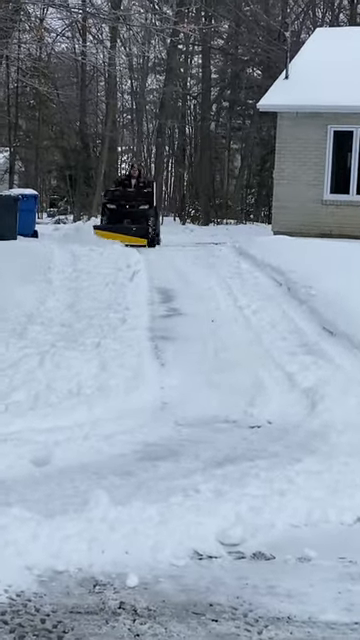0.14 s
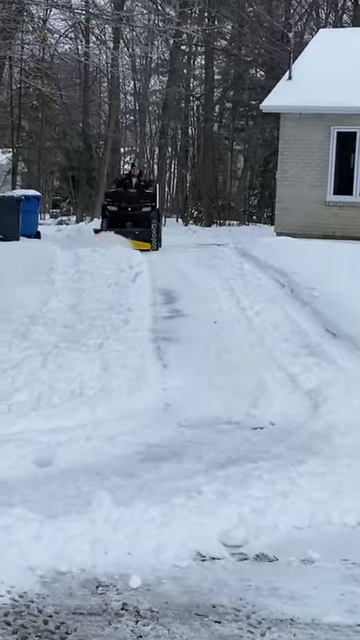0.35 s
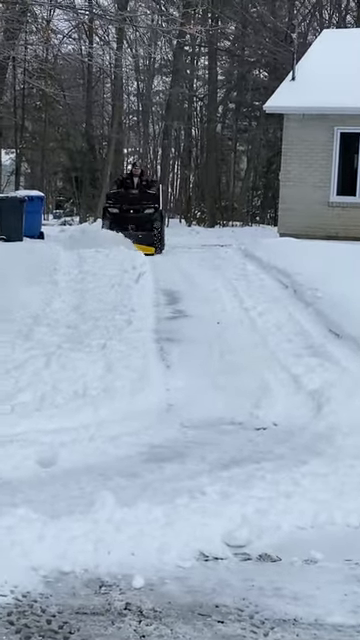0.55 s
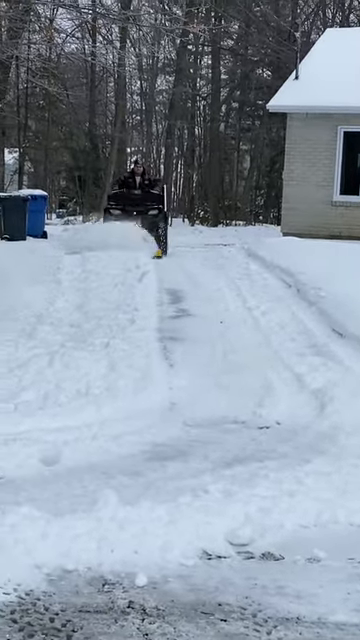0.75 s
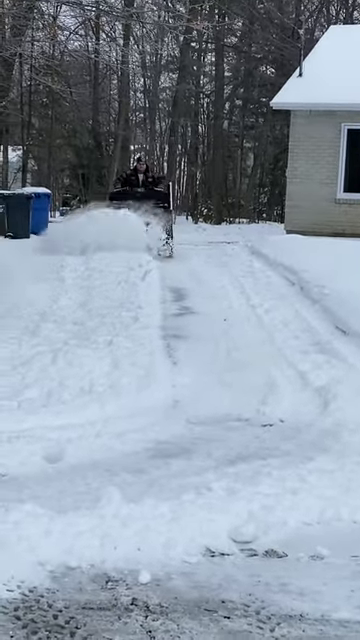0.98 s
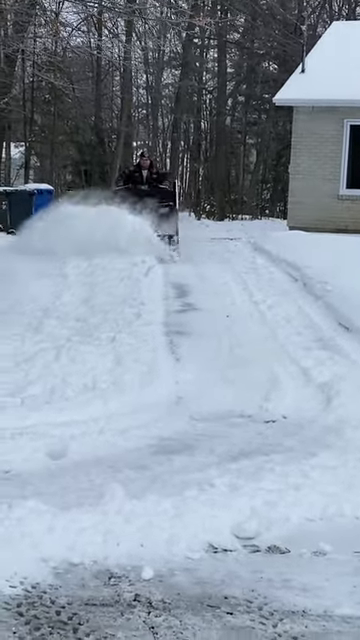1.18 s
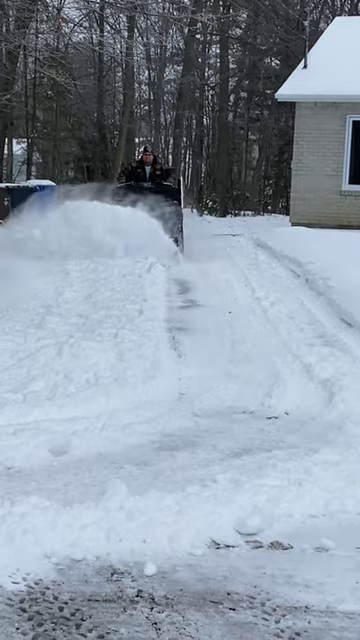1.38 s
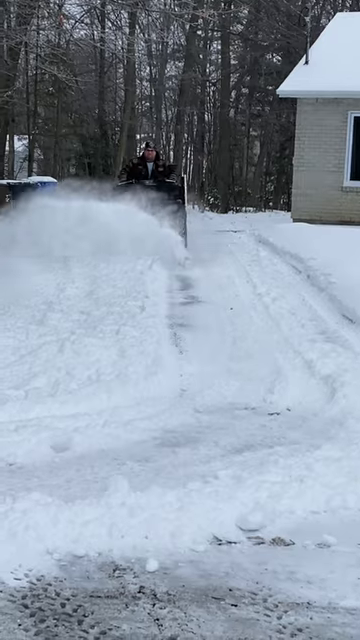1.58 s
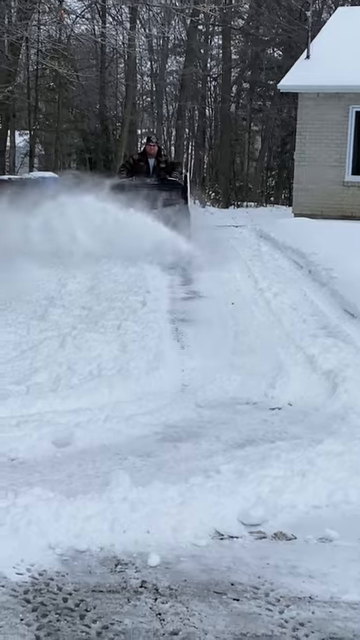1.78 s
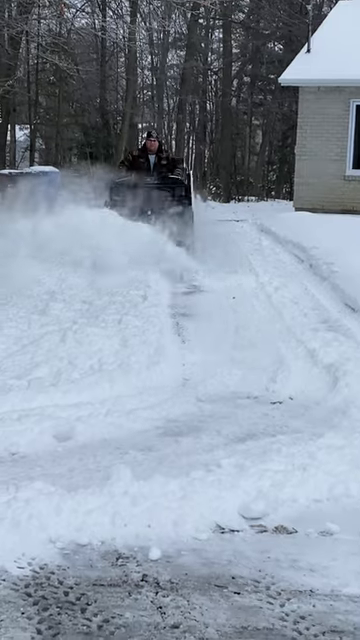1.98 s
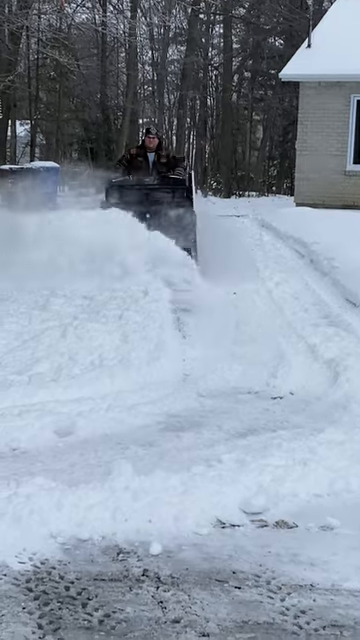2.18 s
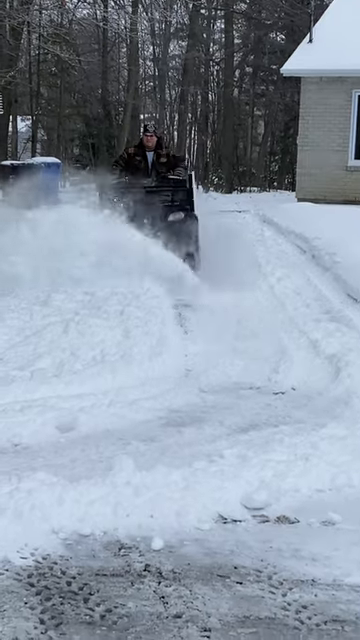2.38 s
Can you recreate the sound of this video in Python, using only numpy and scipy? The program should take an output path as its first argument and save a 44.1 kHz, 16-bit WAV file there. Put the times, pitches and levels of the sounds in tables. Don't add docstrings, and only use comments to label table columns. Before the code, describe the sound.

A small four-wheeler's low engine drones and sags under load with gear whine; its blade bites, scrapes and bumps frozen ground, snow hisses, then heavy metallic slams; outdoors, approaching a phone microphone in light breeze.

```python
import sys
import numpy as np
from scipy import signal
from scipy.fft import rfft, irfft, next_fast_len
from scipy.io import wavfile

SR = 44100
rng = np.random.default_rng(int(sys.argv[2]) if len(sys.argv) > 2 else 0)


def elevation(decibels):
    levels = np.asarray(decibels, float)
    return 10 ** (levels / 20)


def store_pcm(level_fs):
    pcm = np.round(np.clip(level_fs, -1, 1) * 32767).astype(np.int16)
    wavfile.write(sys.argv[1], SR, np.atleast_2d(pcm).T)


N = 112014


def rms_one(x):
    return x / np.sqrt(np.mean(x ** 2) + 1e-20)


def in_time(rows):
    s, *columns = np.transpose(rows)
    return [np.interp(np.arange(N) / SR, s, c) for c in columns]


def at_hz(points, hz):
    point_hz, value = np.array(points).T
    return np.interp(np.log(hz), np.log(point_hz), value)


def drift(rate_per_s):
    r = np.exp(-80 * np.pi * rate_per_s / SR)
    noise = rng.standard_normal(N // 40 + 2002)
    slow = signal.lfilter([1], [1, -2 * r, r * r], noise)[2000:]
    return np.interp(np.arange(N) / 40, np.arange(len(slow)), rms_one(slow))


def ring(x, hz, t60_s):
    r = elevation(-60 / (t60_s * SR))
    w = 2 * np.pi * hz / SR
    return signal.lfilter([0, np.sin(w)], [1, -2 * r * np.cos(w), r * r], x + 1e-18)


def butter(x, hz, kind, order=2):
    return signal.sosfilt(signal.butter(order, hz, kind, fs=SR, output="sos"), x)


def butter_twice(x, hz, kind):
    return butter(butter(x, hz, kind), hz, kind)


def coloured(sources, spectrum, patchy_db):
    edges_hz = np.geomspace(spectrum[0][0], min(spectrum[-1][0], 17000), 16)
    out = np.zeros(N)
    for k, (lo, hi) in enumerate(zip(edges_hz, edges_hz[1:])):
        level_db = at_hz(spectrum, np.sqrt(lo * hi)) + patchy_db * drift(22.5)
        out += elevation(level_db) * butter(sources[k % 2], [lo, hi], "band")
    return rms_one(out)


def grains(per_s, spread_db):
    size = elevation(spread_db * np.minimum(rng.exponential(1, (2, N)), 5))
    sign = rng.choice([-1, 1], (2, N))
    return size * sign * (rng.random((2, N)) < per_s / SR) + 1e-18


def wind():
    breeze_db, gust_db, gust_s, gust_length_s = -67, -41.5, 0.26, 0.1
    t = np.arange(N) / SR
    gust = elevation(gust_db) * np.exp(-((t - gust_s) / gust_length_s) ** 2)
    puffs = rms_one(butter_twice(rng.standard_normal(N), (50, 302), "band"))
    breeze = elevation(breeze_db + 7.3 * drift(5.5))
    return (gust + breeze) * puffs * np.array([[1], [-1]])


# (time [s], scrape level [dB], thrown snow level [dB])
BLADE = [(0, -49.5, -64), (.25, -50, -61.5), (.575, -50, -57.5), (.6, -40.5, -54), (.7, -43.5, -52.5),
         (.78, -47.5, -56), (.85, -41.5, -52), (.95, -45.5, -48.5), (1.08, -41.5, -45.5), (1.2, -39, -45),
         (1.4, -41.5, -43.5), (1.6, -41.5, -45), (1.8, -39.5, -42.5), (2.05, -42, -37.5),
         (2.15, -41, -41.5), (2.35, -37, -42), (2.48, -43, -46.5), (2.54, -37, -40.5)]
# (frequency [Hz], density [dB per Hz])
SCRAPE_SPECTRUM = [(250, 7), (420, 2), (800, 3), (1250, -1.5), (1650, 2.5), (2100, -9.5), (2600, -0.5),
                   (5000, -23.5)]
# (frequency [Hz], density [dB per Hz])
SPRAY_SPECTRUM = [(1500, 1.5), (2500, -4), (4000, 0), (5500, -3), (8000, -1.5), (10000, -10.5),
                  (13000, -12), (16500, -14.5)]


def ploughing():
    scrape_db, spray_db = in_time(BLADE)
    judder = drift(20)
    chatter = grains(per_s=4000, spread_db=2.5) * elevation(1.2 * judder)
    scrape = coloured(chatter, SCRAPE_SPECTRUM, patchy_db=2.0)
    crystals = grains(per_s=12000, spread_db=3) * elevation(0.7 * judder + 0.5 * drift(40))
    spray = coloured(crystals, SPRAY_SPECTRUM, patchy_db=1.6)
    return elevation(scrape_db + 4.0) * scrape + elevation(spray_db + 3.5) * spray


# (time [s], peak level [dB], pitch [Hz])
CHIPS = [(0.5891, -33, 3500), (0.5956, -31, 2500), (0.624, -32, 3000), (0.648, -28, 2200),
         (0.663, -28, 1800), (0.8605, -31, 4500), (0.9423, -31, 4000), (1.0112, -31, 4000),
         (1.082, -25, 4500), (1.2152, -28, 4000), (1.4981, -29, 4000), (1.6886, -23, 3400),
         (1.716, -28, 3600), (1.721, -27, 3600), (1.7959, -26, 4500), (1.8248, -25, 4000),
         (1.843, -27, 4500), (1.8597, -24, 5000), (1.955, -27, 5000), (2.1361, -28, 4000),
         (2.187, -24, 4200), (2.192, -25, 3500), (2.2035, -21, 5000), (2.2125, -24, 4500),
         (2.2514, -25, 4000), (2.2583, -21, 5200), (2.3282, -27, 4200)]


def ice_chips():
    gain_db, cycles = 3, 9
    out = np.zeros(N + 4000)
    click = np.arange(4000) == 0
    for s, db, hz in CHIPS:
        out[int(s * SR):][:4000] += ring(elevation(db + gain_db) * click, hz, cycles / hz)
    return out[:N]


# (time [s], rms level [dB], pitch [Hz], length [s])
SQUEAKS = [
    (1.063, -44, 2420, .015),
    (1.111, -43, 2340, 0.019),
    (1.3, -40, 2470, .015),
    (1.355, -49, 2610, .012),
    (1.448, -40, 2630, 0.011),
    (1.543, -41.5, 2500, .015),
    (1.796, -42, 2581, 0.0097),
    (1.965, -40.5, 2400, .012),
    (2.01, -33.5, 2460, 0.013),
    (2.486, -38.5, 2510, 0.011),
]


def ice_squeaks():
    out = np.zeros(N + 4000)
    t = np.arange(4000) / SR
    middle_s = t.mean()
    for s, db, hz, length_s in SQUEAKS:
        swell = np.exp(-((t - middle_s) / length_s) ** 2)
        tone = rms_one(ring(rng.standard_normal(4000), hz, t60_s=0.024))
        at = out[int((s - middle_s) * SR):][:4000]
        at += elevation(db) * swell * tone
    return out[:N]


# (time [s], level [dB])
SLAMS = [(2.2534, -29), (2.2576, -26), (2.2615, -25), (2.266, -26), (2.271, -28.5), (2.277, -31),
         (2.308, -34), (2.328, -30), (2.334, -31.5), (2.344, -34.5), (2.374, -31), (2.385, -30),
         (2.395, -35), (2.411, -31.5), (2.419, -32)]
# (frequency [Hz], level [dB], t60 [s])
FRAME_MODES = [(157, -12, .09), (269.6, -5, 0.17), (326, -4.5, 0.041), (399, 0.5, 0.13),
               (770, -10.5, 0.039), (988, -4.5, 0.06), (1410, -8, 0.045), (1595, -8, 0.044),
               (1747, 0, 0.052), (2474, -7.5, 0.029), (4240, -11, 0.021), (4600, -12, 0.027),
               (4900, -8.5, 0.047)]


def slams():
    at = [int(s * SR) for s, _ in SLAMS]
    slam_db = np.array(SLAMS)[:, 1]
    size = (len(SLAMS), len(FRAME_MODES))
    share = rng.choice([-1, 1], size) * elevation(rng.normal(0, 1.6, size))
    out = np.zeros(N)
    for (hz, db, t60_s), mode_share in zip(FRAME_MODES, share.T):
        clicks = np.zeros(N)
        clicks[at] = elevation(slam_db + db) * mode_share
        out += ring(clicks, hz, t60_s)
    return butter(out, 5000, "low")


# (time [s], peak level [dB], length [s], brightness [0-1])
BUMPS = [(0.593, -19.5, 0.0056, 0.64), (0.6194, -27, 0.014, 0.5), (0.6444, -22, 0.013, 0.33),
         (0.6744, -25, 0.009, 0.24), (1.1209, -19, 0.045, 0.49), (1.2094, -21.5, 0.02, 0.5),
         (1.2894, -20.5, 0.014, 0.37), (1.3458, -29, 0.039, 0), (1.7994, -18, 0.02, 0.55),
         (2.2544, -15, 0.007, 0.6), (2.2613, -8, 0.013, 0.6), (2.3286, -17, 0.016, 0.44),
         (2.3744, -21.5, 0.023, 0.38), (2.4084, -16.5, 0.011, 0.4), (2.4718, -25.5, 0.043, 0.56),
         (0.8604, -21.0, 0.0098, 0.82), (0.9428, -21, 0.014, 0.57), (1.0819, -17.5, 0.012, 0.74),
         (1.7, -36, 0.0097, 0), (1.055, -27, 0.008, 0.55), (1.8, -25, 0.0099, 0.35),
         (2.5, -20, 0.0036, 0.8), (0.659, -20, 0.0083, 0.55), (0.603, -24, 0.0065, 0.2),
         (1.8597, -12.5, 0.007, 0.74), (2.1889, -13, 0.009, 0.77), (2.2044, -10.5, 0.0072, 0.88)]
# (frequency [Hz], level [dB], t60 [s])
STEEL_MODES = [(410.4, -6.5, 0.11), (286, -8.5, 0.041), (167, 9, 0.037), (830, -23, 0.071),
               (912, -10, 0.072), (1005, -13, 0.059), (1200, -10, 0.02), (1440, -26, 0.063),
               (1550, -12, 0.039), (1650, -9, 0.026), (2520, -15, 0.045), (2970, -16, 0.024),
               (4300, -17, 0.015), (5140, -14.5, 0.0096)]


def bumps():
    steel_db, crunch_db = -20.5, -7
    t = np.arange(N) / SR
    crunch = rng.standard_normal(N)
    dull = 2.8 * butter(crunch, [250, 2460], "band")
    bright = 1.24 * butter(crunch, (2300, 5900), "band", order=1)
    share_db = rng.normal(0, 2.5, (len(BUMPS), len(STEEL_MODES)))
    out = np.zeros(N)
    strikes = np.zeros((len(STEEL_MODES), N))
    for (s, db, length_s, shine), row_db in zip(BUMPS, share_db):
        at = slice(int((s - 0.002) * SR), int((s + 0.12) * SR))
        age = np.maximum(t[at] - s + 0.0041, 0) / max(length_s, 0.002)
        shape = elevation(db) * 3.48 * age ** 0.95 * np.exp(-age * 2.03)
        shine = np.clip(shine, 0, 1)
        out[at] += elevation(crunch_db) * shape * ((1 - shine) * dull[at] + shine * bright[at])
        strikes[:, at] += (1 - shine) * shape * crunch[at] * elevation(row_db)[:, None]
    for x, (hz, db, t60_s) in zip(strikes, STEEL_MODES):
        out += elevation(steel_db + db - 7.5) * ring(x, hz, t60_s)
    return out


# (time [s], pitch [Hz], level [dB])
WHINE = [(0, 1600, -58), (.3, 1570, -54), (.38, 1600, -45), (.52, 1645, -45), (.6, 1665, -52),
         (.9, 1680, -51), (1.0, 1685, -45), (1.15, 1690, -46), (1.22, 1660, -47), (1.4, 1685, -45),
         (1.6, 1670, -45.5), (1.72, 1705, -48), (1.88, 1745, -46), (2.0, 1745, -52), (2.54, 1750, -54)]


def gear_whine():
    width_hz, steadiness = 50, 1.3
    low_share, low_db, low_fade_s = 0.88, -50, 0.55
    hz, level_db = in_time(WHINE)
    shiver = butter(rng.standard_normal((2, N)), width_hz / 2, "low")
    phasor = steadiness + rms_one(shiver[0]) + 1j * rms_one(shiver[1])
    whine = np.real(phasor * np.exp(2j * np.pi * np.cumsum(hz) / SR))
    low_gear = ring(rng.standard_normal(N), low_share * WHINE[0][1], 2.2 / width_hz)
    low_fade = np.exp(-(np.arange(N) / SR / low_fade_s) ** 6)
    return elevation(level_db) * rms_one(whine) + elevation(low_db) * rms_one(low_gear) * low_fade


# (frequency [Hz], density [dB per Hz])
CASING_SPECTRUM = [(350, -23.5), (500, -7.5), (1200, -2.5), (1600, -4.5), (2000, -4.5), (3300, -10),
                   (6000, -22), (16500, -38)]


def casing_clatter(cycle):
    sharpness, lag_cycles = 0.29, 0.44
    beat = np.exp(sharpness * np.cos(cycle - 2 * np.pi * lag_cycles))
    return coloured(rng.standard_normal((2, N)) * beat, CASING_SPECTRUM, patchy_db=2.0)


def exhaust_puff(cycle):
    bursts = rng.standard_normal(N) * np.exp(0.8 * np.cos(2 * cycle))
    return rms_one(butter_twice(bursts, (38, 320), "band"))


FREE_HZ = 35
WAVER_PER_S, WAVER_RAD = 6, 0.045
# (multiple of cycle rate [1], level [dB])
ORDERS = [(1, -23.5), (2, -3), (3, -3.5), (4, -0.5), (5, -2.5), (6, -12), (7, -10), (8, -19.5), (9, -23.5),
          (10, -33.5)]


def exhaust_tones(hz, cycle):
    boom_hz, boom_width_hz, boom_db = 118.3, 13.8, 6.5
    waver_db, brighten_db_per_hz = 1.8, 0.35
    odd_rad, odd_rad_per_order = -4.3, 0.75
    sag_hz = FREE_HZ - hz
    strain = np.clip(0.4 + sag_hz / 5, 0, 1)
    out = np.zeros(N)
    for k, db in ORDERS:
        if k == 2:
            continue
        boom = boom_db / (1 + ((k * hz - boom_hz) / boom_width_hz) ** 2)
        brighten = brighten_db_per_hz * max(k - 5, 0) * sag_hz
        level_db = db + brighten + strain * waver_db * drift(WAVER_PER_S) + boom
        phase = k * (cycle + strain * WAVER_RAD * drift(WAVER_PER_S))
        phase = phase + k % 2 * (odd_rad + odd_rad_per_order * k)
        out += elevation(level_db) * np.cos(phase)
    return rms_one(out)


# (time [s], cycle rate [Hz], exhaust level [dB], once-per-turn throb level [dB])
ENGINE = [(0.0, 35.15, -27.5, -35), (0.4, 34.22, -24.5, -31.5), (0.56, 34.08, -26, -39.5),
          (0.81, 33.05, -27.5, -33), (0.94, 32.78, -24, -30), (1.21, 31.86, -25.5, -30.5),
          (1.39, 31.47, -24, -38), (1.64, 31.1, -23, -29), (1.9, 31.18, -24, -28), (2.0, 30.9, -21, -48),
          (2.03, 30.86, -21, -32), (2.1, 30.83, -24.5, -37), (2.26, 30.72, -21, -30),
          (2.48, 30.83, -22.5, -26.5), (2.51, 30.3, -21, -33), (2.54, 30.7, -19.5, -40)]


def engine():
    puff_db, puff_db_per_hz, casing_db, start_rad = -23, 2.8, -20.5, -0.55
    hz, level_db, throb_db = in_time(ENGINE)
    cycle = start_rad + 2 * np.pi * np.cumsum(hz) / SR
    tones = exhaust_tones(hz, cycle)
    throb = elevation(throb_db + 3) * np.cos(2 * cycle + 0.3 + 2 * WAVER_RAD * drift(WAVER_PER_S))
    puff = elevation(puff_db + puff_db_per_hz * (FREE_HZ - hz)) * exhaust_puff(cycle)
    casing = elevation(casing_db) * casing_clatter(cycle)
    return elevation(level_db) * (tones + puff + casing) + throb


def scene():
    drive = engine() + gear_whine()
    blade = ploughing() + bumps() + slams() + ice_chips() + ice_squeaks()
    vehicle = butter(drive + blade, 28, "high")
    return np.tile(vehicle, (2, 1)) + wind()


# (frequency [Hz], left lead [rad])
PORT_LEAD = [(350, 0), (750, -.6), (1100, -.45), (1350, 0), (2100, .03), (2450, .5), (3000, 0), (4200, 0)]
# (frequency [Hz], left minus right [dB])
PORT_BALANCE = [(300, 0), (560, 2), (860, -2), (1110, -5.5), (1400, -0.5), (1800, -0.1), (2200, 0),
                (3000, 0.5)]


def band_limit(x):
    return signal.sosfilt(signal.butter(12, 17090, fs=SR, output="sos"), x)


def record(dry):
    lag_s, lag_growth_hz, ripple_rad = 0.000148, 110000, 0.34
    cavity_hz, cavity_width_hz, cavity_rad = 4420, 220, 0.65
    limit, scatter_db, scatter_hz, top_hz = 0.5, -16, 1500, 15880
    size = next_fast_len(N + 4096)
    hz = np.maximum(np.arange(size // 2 + 1) * SR / size, 1)
    above_hz = np.maximum(hz - PORT_LEAD[-1][0], 0)
    late = 2 * np.pi * lag_s * above_hz * (1 + above_hz / lag_growth_hz)
    cavity = cavity_rad * np.exp(-((hz - cavity_hz) / cavity_width_hz) ** 2)
    lead = at_hz(PORT_LEAD, hz) + late - ripple_rad * np.sin(2 * late) + cavity
    half = np.array([[0.5], [-0.5]])
    response = np.exp(1j * half * lead) * elevation(half * at_hz(PORT_BALANCE, hz))
    limited = limit * np.tanh(dry / limit)
    ports = irfft(rfft(limited, size) * response, size)[:, :N]
    scatter = butter_twice(dry, scatter_hz, "high") * drift(140) * np.array([[1], [-1]])
    top = signal.cheby2(24, 50, top_hz, fs=SR, output="sos")
    mix = signal.sosfilt(top, ports + elevation(scatter_db) * scatter)
    return band_limit(mix)


dry = scene()
out = record(dry)
store_pcm(out)
```